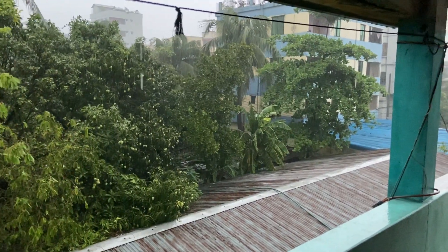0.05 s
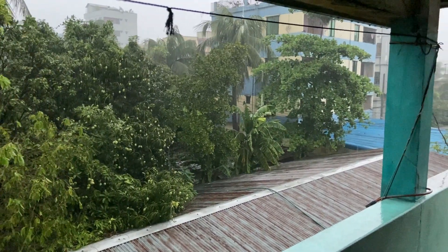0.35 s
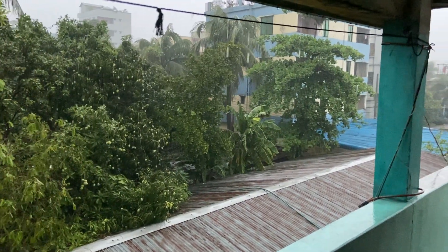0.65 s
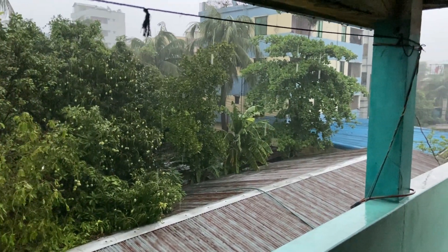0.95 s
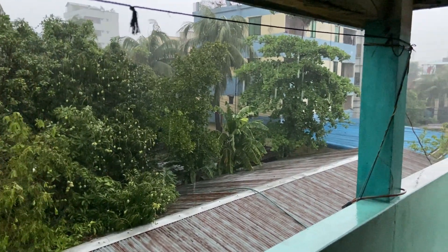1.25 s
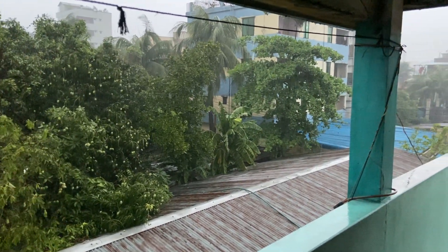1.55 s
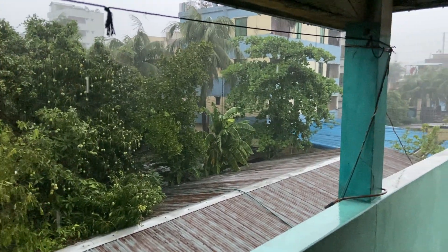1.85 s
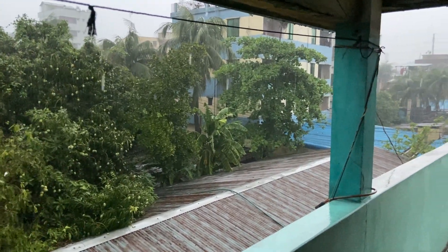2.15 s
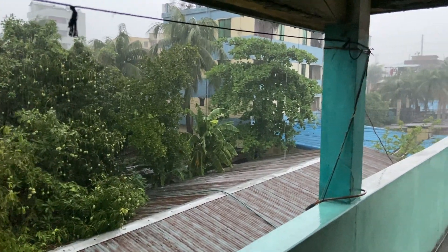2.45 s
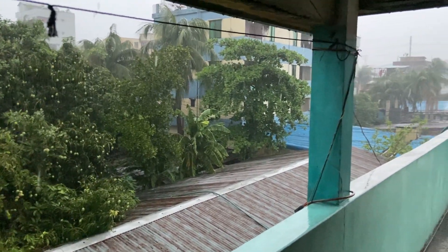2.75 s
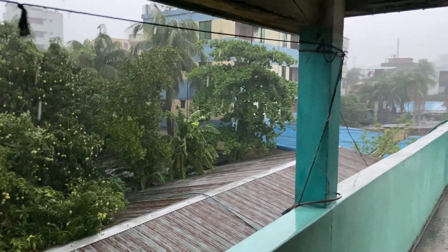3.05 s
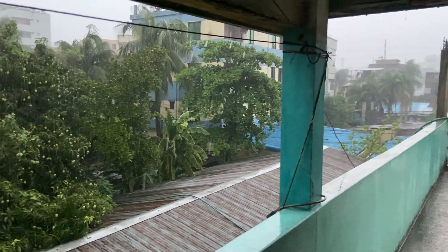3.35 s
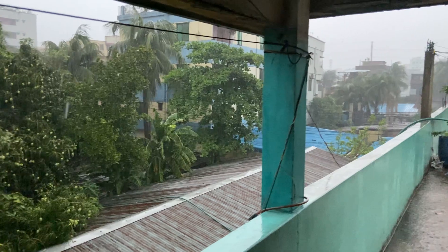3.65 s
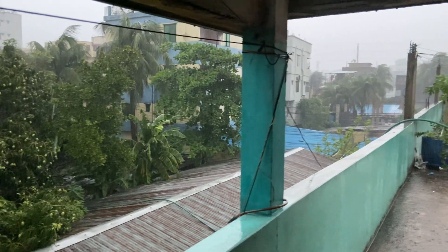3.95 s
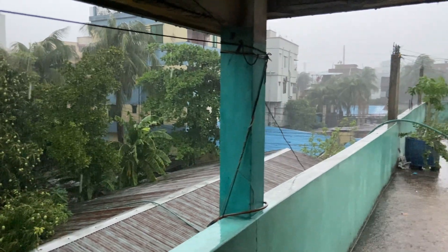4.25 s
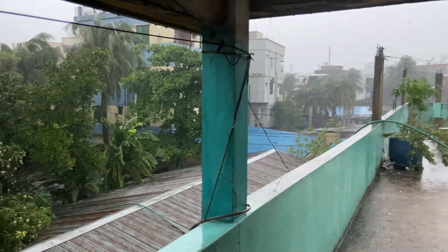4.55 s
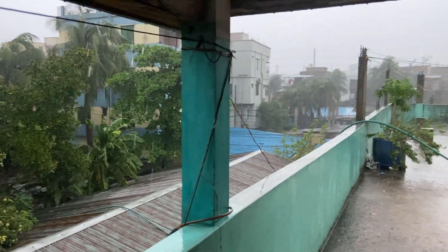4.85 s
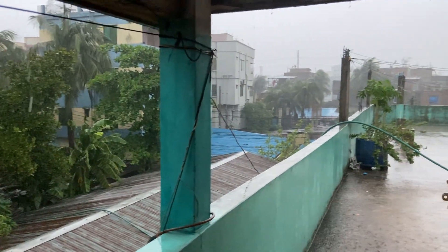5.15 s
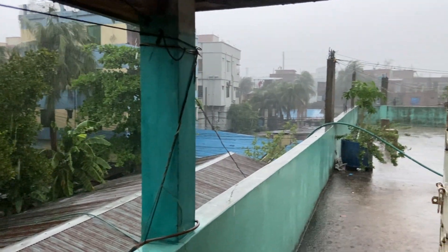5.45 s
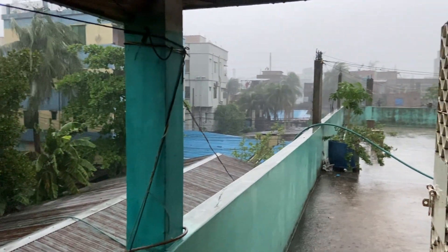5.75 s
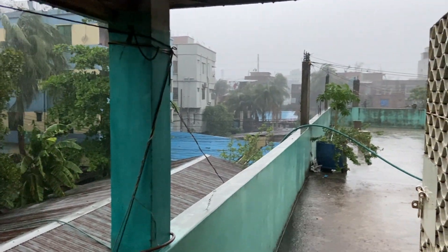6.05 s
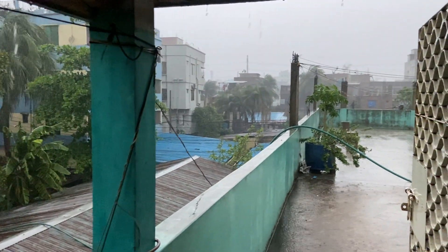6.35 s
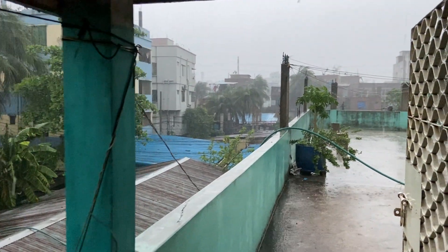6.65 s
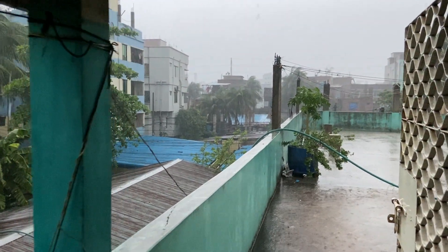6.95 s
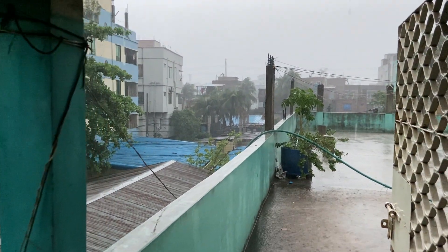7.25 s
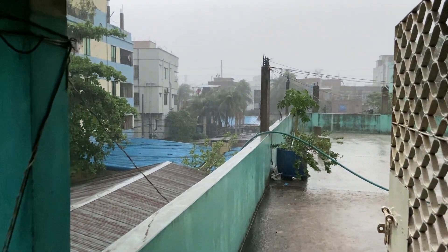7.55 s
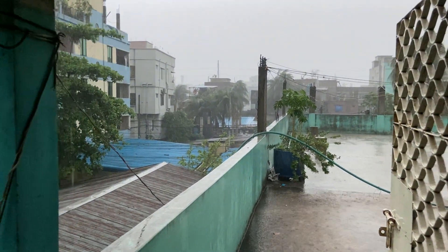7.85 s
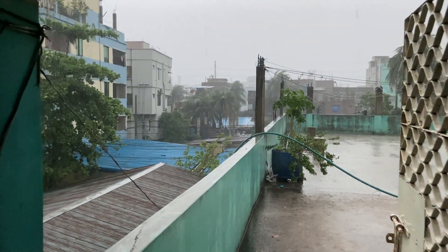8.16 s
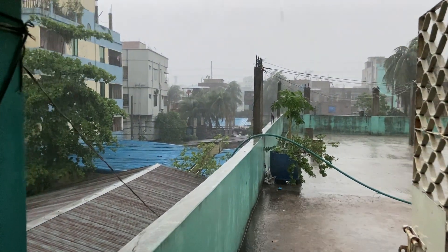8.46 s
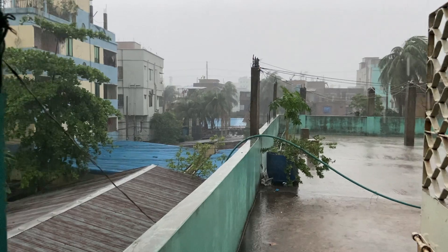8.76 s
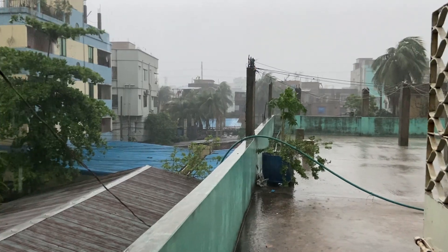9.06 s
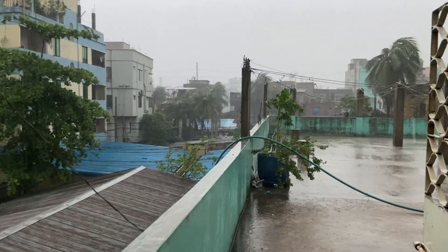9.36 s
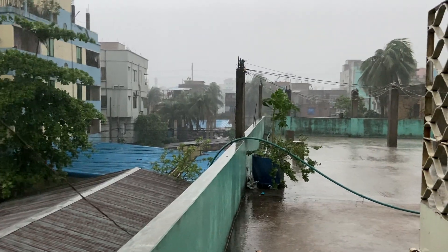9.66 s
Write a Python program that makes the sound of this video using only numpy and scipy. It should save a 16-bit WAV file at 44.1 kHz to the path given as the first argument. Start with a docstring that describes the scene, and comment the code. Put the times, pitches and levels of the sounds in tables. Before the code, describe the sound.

Heavy rain pours on metal roofs and trees while distant thunder rumbles, growing louder and harsher in the second half.

```python
"""On a covered balcony, heavy rain is heard pouring on corrugated metal roofs and trees.
Distant thunder, a pile-up of shock waves, rolls throughout, louder and harsher in the second half;
a low drone and a few brief tones sound with it. Countless drops merge into a wash, tick on leaves
and concrete and excite the modes of the roof sheets; a few splash on the ledge close by."""
import sys
import numpy as np
from scipy import signal
from scipy.fft import rfft, irfft, next_fast_len
from scipy.io import wavfile
from scipy.ndimage import uniform_filter1d

SR = 44100
rng = np.random.default_rng(int(sys.argv[2]) if len(sys.argv) > 2 else 0)


def unload_wav(signal):
    """Save mono or channel-first audio to the path in sys.argv[1] as 16-bit WAV at rate SR, clipped to [-1, 1]."""
    wavfile.write(
        sys.argv[1],
        SR,
        np.round(np.clip(np.atleast_2d(signal).T, -1, 1) * 32767).astype(np.int16),
    )


N = 428211
TIME = np.arange(N) / SR


def amp(db):
    """Decibels to amplitude ratio."""
    return 10 ** (np.asarray(db) / 20)


def unit_rms(x):
    """Normalisation to an rms of one."""
    return x / np.sqrt(np.mean(x ** 2) + 1e-20)


def decay(t, t60):
    """Exponential damping: 60 dB down after t60 seconds."""
    return np.exp(-np.log(1000) * t / t60)


def at_frequency(rows, hz, column=1):
    """Interpolation of one column along a log-frequency axis."""
    columns = np.transpose(rows)
    return np.interp(np.log(hz + 1), np.log(columns[0] + 1), columns[column])


def curves(rows):
    """Linear interpolation of each column over time."""
    seconds, *columns = np.transpose(rows)
    return [np.interp(TIME, seconds, column) for column in columns]


def coloured(x, spectrum):
    """Spectral shaping, with 12 dB per octave skirts beyond the table's ends; rms one."""
    length = next_fast_len(x.shape[-1])
    hz = np.fft.rfftfreq(length, 1 / SR)
    skirts = np.minimum(hz / spectrum[0][0], 1) ** 2 / np.maximum(hz / spectrum[-1][0], 1) ** 2
    shaped = rfft(x, length) * amp(at_frequency(spectrum, hz)) * skirts
    return unit_rms(irfft(shaped, length)[..., :x.shape[-1]])


def impacts(per_s, spread_db, channels=2):
    """A Poisson process: impulses of either sign, most small and a few large."""
    size = amp(spread_db * np.minimum(rng.exponential(1, (channels, N)), 5))
    return size * rng.choice([-1, 1], (channels, N)) * (rng.random((channels, N)) < per_s / SR)


def rumble(spectrum, gain, width, lean_db, per_s=1400, spread_db=1.5):
    """Shot noise: dense filtered impulses overlap; the middle signal is levelled, the side adds width."""
    middle, side = coloured(impacts(per_s, spread_db), spectrum)
    power = uniform_filter1d(uniform_filter1d(middle ** 2, size=7000), size=4000)
    middle = middle / np.sqrt(power + 1e-6)
    lean = amp(lean_db / 2)
    return gain * np.array([(middle + width * side) * lean, (middle - width * side) / lean])


# The drone's spectrum. Each row: frequency in Hz, relative density in dB.
DRONE_SPECTRUM = [(88, -18), (100, 3.5), (110, -0.5), (118, 1.5), (131, 2), (142, -12.5), (156, -32)]
# The drone's envelope. Each row: time in seconds, level in dB.
DRONE_ENVELOPE = [(0, -30.5), (1.7, -29), (2.0, -35), (2.4, -42), (2.8, -31.5), (3.3, -26), (4.2, -28.5),
                  (5.0, -37), (5.6, -30), (6.4, -33.5), (6.9, -22), (7.5, -32), (8.2, -32), (8.9, -31.5),
                  (9.71, -26.5)]


def drone():
    """Narrow-band noise is heard as a low drone that swells and sinks under the thunder."""
    return rumble(DRONE_SPECTRUM, amp(curves(DRONE_ENVELOPE)[0]), width=0.27, lean_db=-2.0)


# Tones that rise out of the noise. Each row: start and end in seconds, pitch in Hz, level in dB,
# flutter depth in dB.
BRIEF_TONES = [(0.303, .95, 177.2, -34, 5.5), (2.7, 3.4, 75.7, -29, 1), (3.75, 4.17, 76, -26.5, 0),
               (8.013, 8.293, 169.6, -19, 6.5), (8.68, 8.934, 77, -20.5, 9), (8.85, 9.3, 920, -38, 11),
               (8.95, 9.4, 614, -36, 4)]


def tones(waver=0.0085):
    """Random frequency and amplitude modulation make each tone waver as it swells and fades."""
    out = np.zeros(N)
    slow_spectrum = [(2, 0), (14, 0), (30, -20)]
    for start, end, hz, db, flutter_db in BRIEF_TONES:
        drift, flutter = (coloured(row, slow_spectrum) for row in rng.standard_normal((2, N)))
        swell = np.sin(np.pi * np.clip((TIME - start) / (end - start), 0, 1))
        cycles = np.cumsum(hz * (1 + waver * drift)) / SR
        out += amp(db + flutter_db * np.tanh(flutter)) * swell * np.sqrt(2) * np.sin(2 * np.pi * cycles)
    return out


# Peals that stand out of the roll. Each row: start and hold in seconds, body, boom and growl in dB.
THUNDER_PEALS = [(-0.05, 0.6, -27, -49, -36), (1.387, 0.045, -23.5, -35, -34), (1.65, 0.068, -31, -29, -34),
                 (2.582, 0.4, -21, -41, -38), (3.792, 0.39, -29, -38, -47), (5.132, 0.28, -39, -28, -40),
                 (5.507, 0.12, -32, -28, -27), (6.13, 0.19, -37, -24, -25.5), (6.61, 0.5, -20, -40, -33),
                 (7.08, 0.12, -34, -36, -29), (7.307, 0.34, -22.5, -27, -34), (8.09, 0.4, -21, -22.5, -29),
                 (8.56, 0.065, -19.5, -38, -44), (9.25, 0.087, -22.5, -26, -25.5),
                 (9.66, 0.089, -19, -39, -23)]


def peal_gains(attack_s=0.032, t60=0.71):
    """Incoherent peals add in power; each rises, holds and decays. Gains of body, boom and growl."""
    power = np.zeros((3, N))
    for start, hold, *levels_db in THUNDER_PEALS:
        age = TIME - start
        envelope = np.clip(age / attack_s, 0, 1) * decay(np.maximum(age - attack_s - hold, 0), t60)
        power += (amp(levels_db)[:, None] * envelope) ** 2
    return np.sqrt(power)


# The thunder's four registers, low to high. Each row: frequency in Hz, relative density in dB.
BOOM_SPECTRUM = [(15, -46), (27, -32), (35, -19), (44, -4.5), (54, 2.5), (62, 0.5), (80, -20.5)]
BODY_SPECTRUM = [(52, -6), (66, -12.5), (76, 6), (100, -3), (128, -2.5), (150, -14), (200, -33)]
GROWL_SPECTRUM = [(115, -33), (148, -1), (172, 3), (205, -4.5), (245, -4), (300, -8.5), (380, -21),
                  (520, -43), (900, -60)]
RASP_SPECTRUM = [(220, -7), (320, 1), (400, -2.5), (520, -5), (700, -11), (1100, -20.5), (2200, -33)]
# The long roll that body, boom and growl follow. Each row: time in seconds, driving level in dB.
ROLL_ENVELOPE = [(0, -34), (2.3, -32.5), (3.6, -30.5), (4.8, -29.5), (5.5, -21.5), (6.0, -23.5),
                 (6.8, -18.5), (7.9, -24.5), (9.0, -24.5), (9.71, -25)]
# The rasp from the lightning's nearest branches. Each row: time in seconds, level in dB.
RASP_ENVELOPE = [(0, -64), (4.6, -43.5), (5.5, -38), (6.15, -46), (6.75, -31.3), (7.25, -32.5),
                 (7.42, -28.5), (7.7, -31), (8.25, -29.5), (8.72, -36), (9.1, -33), (9.35, -35.5),
                 (9.71, -35.5)]


def thunder(roll_reference_db=-30, rasp_per_growl_db=-11):
    """Shock waves from the lightning's bends superpose; higher registers scatter wider among houses."""
    swell_db = curves(ROLL_ENVELOPE)[0] - roll_reference_db
    rolling = [amp(-28 + 0.53 * swell_db), amp(-31.5 + 0.69 * swell_db), amp(-31 + 0.99 * swell_db)]
    pealing = peal_gains()
    body, boom, growl = np.hypot(rolling, pealing)
    rasp = np.hypot(amp(curves(RASP_ENVELOPE)[0]), amp(rasp_per_growl_db) * pealing[2])
    return (rumble(BOOM_SPECTRUM, boom, width=0.13, lean_db=-2.0)
            + rumble(BODY_SPECTRUM, body, width=0.1, lean_db=-0.5)
            + rumble(GROWL_SPECTRUM, growl, width=0.28, lean_db=-2.0)
            + rumble(RASP_SPECTRUM, rasp, width=0.5, lean_db=-1.0))


# Thumps in the thunder. Each row: start in seconds, level in dB, pitch in Hz, t60 in seconds.
LONE_SHOCKS = [(1.369, -11, 82, 0.18), (1.43, -12.5, 147.5, 0.099), (2.86, -14, 84, 0.12),
               (7.61, -10, 79, 0.086)]
# A thump's modes. Each row: ratio to its pitch, relative level in dB.
SHOCK_MODES = [(1, -0.5), (1.5, -4), (2.3, -10)]


def thumps(attack_s=0.0037):
    """Impulse response: a strong shock wave arrives alone and rings briefly among the houses."""
    out = np.zeros(N)
    for start, db, hz, t60 in LONE_SHOCKS:
        age = np.maximum(TIME - start, 0)
        ring = sum(amp(mode_db) * np.sin(2 * np.pi * hz * ratio * age) for ratio, mode_db in SHOCK_MODES)
        out += amp(db - 60 * np.minimum(age / t60, 2)) * np.minimum(age / attack_s, 1) * ring
    return out


# The spectrum of far drops. Each row: frequency in Hz, relative density in dB.
WASH_SPECTRUM = [(100, -14), (400, -1.5), (600, -2.5), (800, -1.5), (1400, -3), (2000, -5.5), (2700, -9),
                 (3500, -13), (4700, -14.5), (6000, -18.5), (8000, -20.5), (12500, -22), (14200, -23),
                 (15700, -28.5)]


def wash(level_db=-31.5, patchy_db=0.69, flicker_db=0.6):
    """Far drops sum to Gaussian noise that thickens and thins in patches as sheets of rain land."""
    hz, frames, bins = signal.stft(rng.standard_normal((2, N)), SR, nperseg=512)
    patches = uniform_filter1d(rng.standard_normal(bins.shape[1:]), size=8, axis=0)
    patches = unit_rms(uniform_filter1d(patches, size=14, axis=1))
    flicker = unit_rms(uniform_filter1d(rng.standard_normal(len(frames)), size=9))
    treble_flicker = flicker * np.minimum(hz / 7000, 1)[:, None]
    gain = amp(patchy_db * patches + flicker_db * treble_flicker)
    hiss = signal.istft(bins * gain, SR, nperseg=512)[1][:, :N]
    return amp(level_db) * coloured(hiss, WASH_SPECTRUM)


# The envelope of the faint pings. Each row: time in seconds, level in dB.
PING_ENVELOPE = [(0, -40.5), (2.0, -39.5), (4.6, -42), (9.71, -41.5)]


def pings(per_pitch_per_s=4, spread_db=2.0, t60=0.11, low_hz=680, high_hz=2500, pitches=48, detune=.02):
    """Damped sinusoids at scattered pitches are heard as faint short pings within the rain."""
    t, out = np.arange(SR // 8) / SR, np.zeros((2, N))
    for hz in np.geomspace(low_hz, high_hz, pitches):
        for when, size, tuning, bearing in rng.random((round(per_pitch_per_s * N / SR), 4)):
            note_hz = hz * (1 + detune * (2 * tuning - 1))
            ring = np.sin(2 * np.pi * note_hz * t) * decay(t, t60)
            gain = amp(spread_db * min(-np.log1p(-size), 4)) * (low_hz / hz) ** .7
            split = np.array([[np.cos(2 * np.pi * bearing)], [np.sin(2 * np.pi * bearing)]])
            part = out[:, int(when * N):][:, :len(t)]
            part += (gain * split * ring)[:, :part.shape[1]]
    return amp(curves(PING_ENVELOPE)[0]) * unit_rms(out)


# Modes of the roof sheets. Each row: frequency in Hz, relative level in dB, t60 in seconds.
SHEET_MODES = [(600, 1, 0.27), (730, 6.5, 0.039), (799, 4, 0.11), (903, 5, 0.16), (1079, 2, 0.086),
               (1276, -4, 0.038), (1548, 3.5, 0.061), (2057, -7, 0.044), (2520, -9, 0.036)]


def roofs(level_db=-41, drops_per_s=18, spread_db=2.5, sheets=3):
    """Impacts excite the damped modes of metal sheets, each sheet tuned a little differently."""
    t, out = np.arange(SR // 6) / SR, np.zeros((2, N))
    for hz, db, t60 in SHEET_MODES * sheets:
        detuned_hz = hz * rng.uniform(.965, 1.035, (2, 1))
        ring = np.sin(2 * np.pi * detuned_hz * t) * decay(t, t60)
        struck = signal.oaconvolve(impacts(drops_per_s, spread_db), ring, axes=1)[:, :N]
        out += amp(db) * unit_rms(struck)
    return amp(level_db) * unit_rms(out)


# A drop's bright spray and lower slap. Each row: frequency in Hz, relative density in dB.
SPRAY_SPECTRUM = [(2000, -28), (6000, -10), (9000, -2), (11000, 0), (13000, -1), (14500, -2), (15700, -6)]
SLAP_SPECTRUM = [(1000, -27), (3000, -1), (4800, -2), (7000, -2), (10000, -17)]


def patter(spray_db=-64.0, slap_db=-52, drops_per_s=150, spread_db=2.5, t60=0.05, tick=1.2):
    """Small drops tick and scatter on leaves and wet concrete; their noise bursts add in power."""
    t = np.arange(SR // 12) / SR
    fade = decay(t, t60) + tick * np.exp(-t / .0007)
    hits = impacts(drops_per_s, spread_db, channels=4)
    power = signal.oaconvolve(hits ** 2, fade[None] ** 2, axes=1)[:, :N]
    scatter = np.sqrt(abs(power)) * rng.standard_normal((4, N))
    spray = amp(spray_db) * coloured(scatter[:2], SPRAY_SPECTRUM)
    return spray + amp(slap_db) * coloured(scatter[2:], SLAP_SPECTRUM)


# Big drops on the ledge. Each row: start in seconds, tick level over one millisecond in dB,
# spray level in dB, slap relative to the spray in dB, t60 of the spray in seconds.
LEDGE_DROPS = [(.2035, -46, -45, 8, .09), (.2615, -35, -41, -12, .09), (.3525, -38, -42, -10, .035),
               (.4465, -38, -43, -14, .07), (1.1825, -35, -42, -14, .03), (1.2033, -29.5, -38, 4, .04),
               (1.9485, -39, -43, -10, .05), (3.1752, -31, -36.5, -14, .08), (3.5755, -31, -41, -14, .04),
               (3.6594, -34, -37.5, -8, .07), (3.98, -50, -49, 9, .12), (4.1762, -31, -38, -12, .04),
               (5.968, -40, -44, -6, .08), (5.982, -48, -50, 13, .16), (6.6062, -34, -42, -6, .02),
               (6.8487, -29, -41, -12, .025), (7.012, -50, -51, 13, 0.11), (7.5405, -32, -39, -8, .08),
               (8.2, -42, -39, -9, .11), (8.4275, -35, -43, -12, .02), (8.479, -42, -40.5, 9, .1),
               (8.5427, -30, -27, -7, .12), (8.6343, -36, -42, -12, .04), (8.7128, -35, -38, -8, .075),
               (9.0553, -38, -41, -8, .05), (9.064, -38, -41, -10, .07), (9.6062, -29, -37, -9, .03)]


def splashes(drips_per_s=2.2, tick_s=0.0002, rise_s=0.00076, echo=0.024, echo_t60=.25, spatter_db=1.0):
    """An impact transient, then breakup into droplets on the ledge; the balcony reverberates faintly."""
    t, out = np.arange(SR // 4) / SR, np.zeros(N)
    chances = rng.random((40, 3))  # smaller drips fall at random, with the same columns
    drips = [(when * N / SR, -38.5 - 2 * softness, -46, -14, .05)
             for falls, when, softness in chances if falls < drips_per_s * N / SR / len(chances)]
    for start, tick_db, spray_db, slap_db, t60 in LEDGE_DROPS + drips:
        fizz, slap, spatter = rng.standard_normal((3, len(t)))
        fizz = coloured(fizz, SPRAY_SPECTRUM)
        slap = amp(slap_db) * coloured(slap, SLAP_SPECTRUM)
        tick = unit_rms(fizz * t * np.exp(-t / tick_s)) * np.sqrt(.001 / t[-1])
        fade = decay(t, t60) + echo * decay(t, echo_t60)
        droplets = amp(spatter_db * unit_rms(uniform_filter1d(spatter, size=70)))
        spray = (fizz + slap) * np.minimum(t / rise_s, 1) * fade * droplets
        part = out[round(start * SR):][:len(t)]
        part += (amp(tick_db) * tick + amp(spray_db) * spray)[:len(part)]
    return out


# How hard it rains. Each row: time in seconds, overall gain in dB, extra treble in dB.
RAIN_INTENSITY = [(0, 0, 0), (3.5, 0.87, -1), (4.6, -0.5, -0.5), (6.5, 0.55, 0), (8.3, 0.8, 2),
                  (9.05, 2, 0.6), (9.71, 0.7, 4.5)]


def rain(treble_hz=5000):
    """Superposition of four layers; the rain swells slightly and grows brighter towards the end."""
    gain_db, treble_db = curves(RAIN_INTENSITY)
    layers = wash() + roofs() + pings() + patter()
    treble = signal.sosfiltfilt(signal.butter(1, treble_hz, "high", fs=SR, output="sos"), layers)
    return amp(gain_db) * (layers + (amp(treble_db) - 1) * treble)


# The sound field at the two microphone ports. Each row: frequency in Hz, coherence from 0 to 1,
# phase lead of the left port over the right in radians, left minus right level in dB.
PORT_FIELD = [(100, .96, 0, 2.5), (296, 0.43, 1, -2), (543, 0.3, 1.5, 1.5), (865, 0.9, 2, 2.5),
              (1150, 0.09, 2.5, 1), (1345, 0.39, 3, -1), (1830, 0.15, 3.5, 2), (2220, 0.28, 6.5, 1),
              (3020, 0.5, 7.5, 3), (3650, 0.1, 7, 1.5), (4700, 0.67, 7, 3.5), (5750, 0.06, 7, 2.5),
              (6200, 0.5, 5.5, 1), (7750, 1, 2 * np.pi, -0.5)]


def at_ports(pair, lag_from_hz=6950, hz_per_turn=4200):
    """Partial coherence: two ports mix a shared and an unrelated part; the left lags in the top treble."""
    hz = np.fft.rfftfreq(N, 1 / SR)
    coherence = np.clip(at_frequency(PORT_FIELD, hz, column=1), 0, 1)
    treble_lag = 2 * np.pi * np.maximum(hz - lag_from_hz, 0) / hz_per_turn
    left_lead = at_frequency(PORT_FIELD, hz, column=2) - treble_lag
    lean = amp(at_frequency(PORT_FIELD, hz, column=3) / 2)
    shared, apart = rfft(pair) * np.sqrt([(1 + coherence) / 2, (1 - coherence) / 2])
    return irfft([(shared + apart) * lean * np.exp(1j * left_lead), (shared - apart) / lean], N)


def scene():
    """Linear superposition: far thunder, rain all around, and tones and splashes shared by both ports."""
    shared, apart = rain()
    distant = thunder() + thumps() + drone()
    return distant + at_ports(np.array([shared + tones() + splashes(), apart]))


def record(dry, low_cut_hz=25, band_edge_hz=15720):
    """Band limiting: the microphone cuts the lowest bass and the recorder the highest treble."""
    cut = signal.sosfiltfilt(signal.butter(4, low_cut_hz, "high", fs=SR, output="sos"), dry)
    low_pass = signal.firwin(511, band_edge_hz, window=("kaiser", 9), fs=SR)
    return signal.oaconvolve(cut, low_pass[None], "same")


dry = scene()
out = record(dry)
unload_wav(out)
```